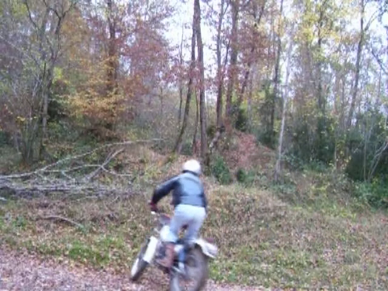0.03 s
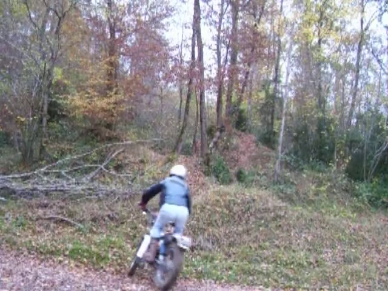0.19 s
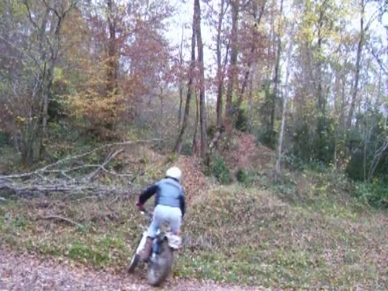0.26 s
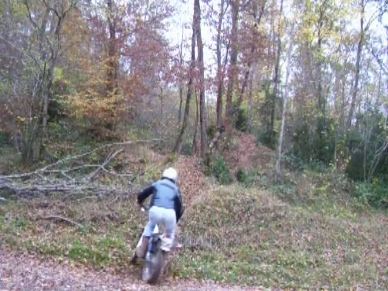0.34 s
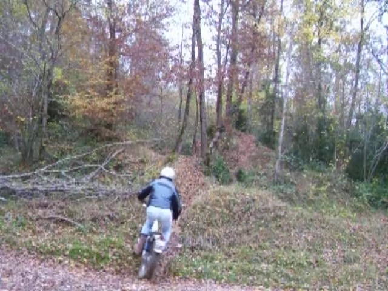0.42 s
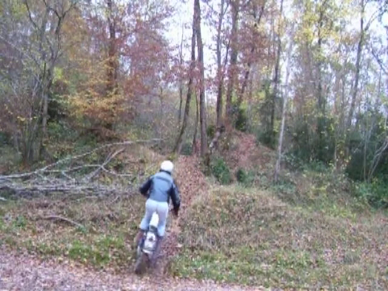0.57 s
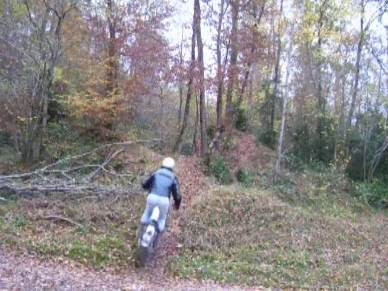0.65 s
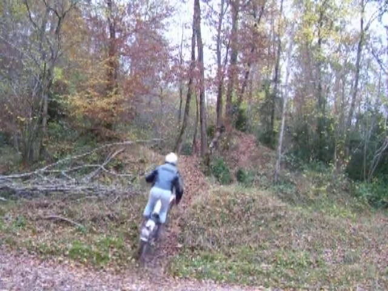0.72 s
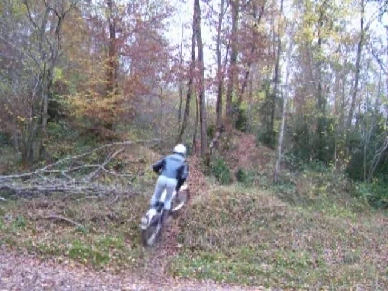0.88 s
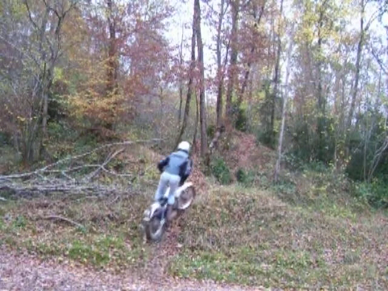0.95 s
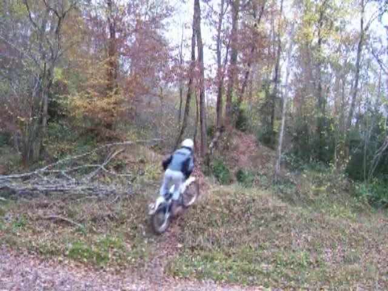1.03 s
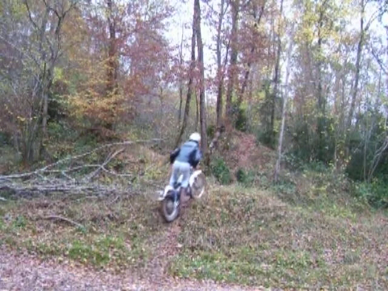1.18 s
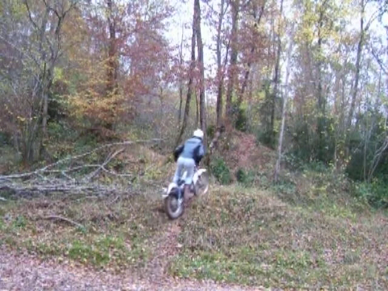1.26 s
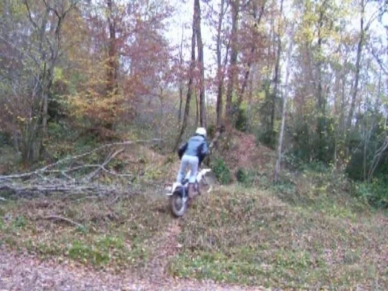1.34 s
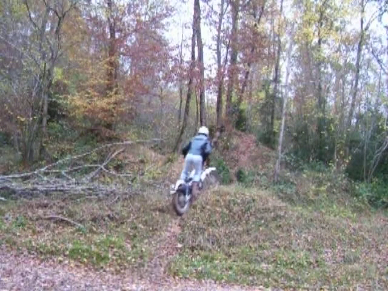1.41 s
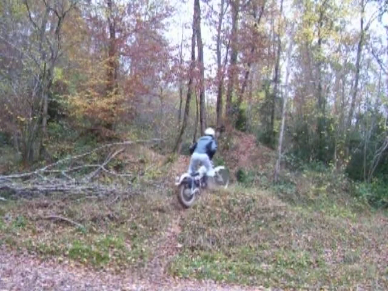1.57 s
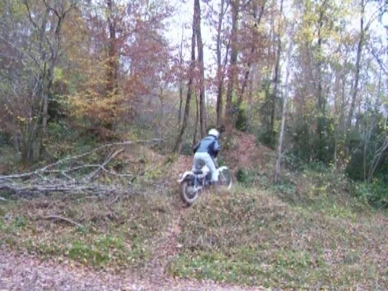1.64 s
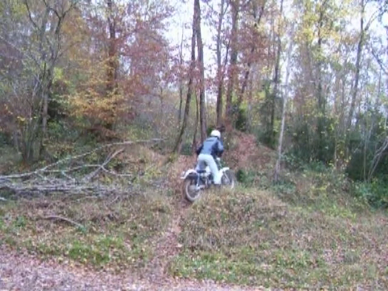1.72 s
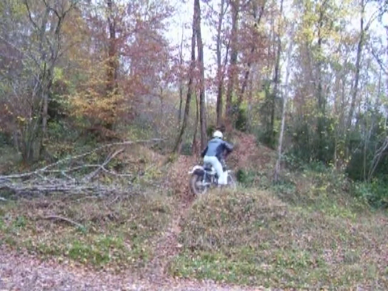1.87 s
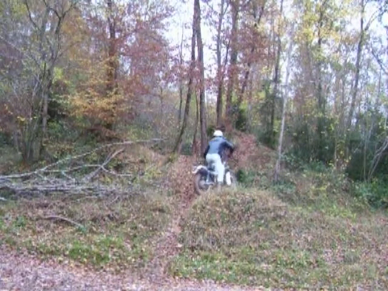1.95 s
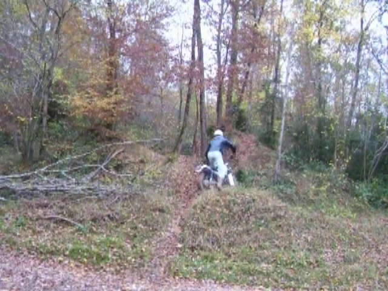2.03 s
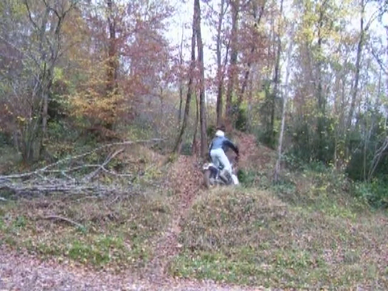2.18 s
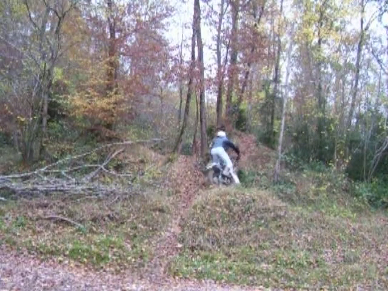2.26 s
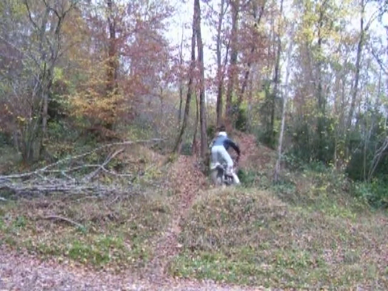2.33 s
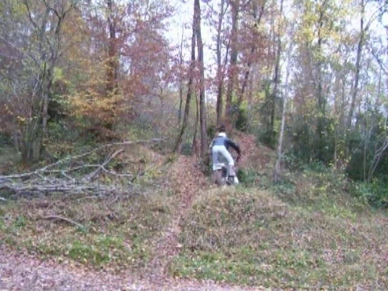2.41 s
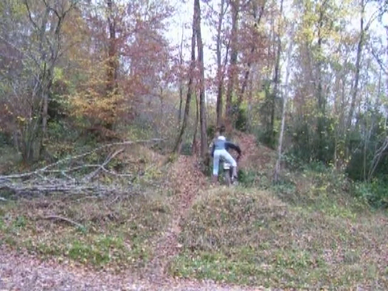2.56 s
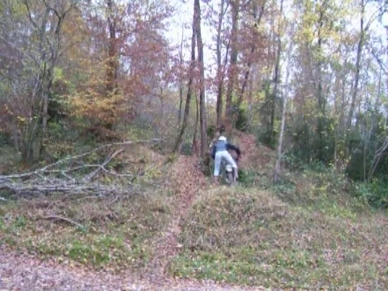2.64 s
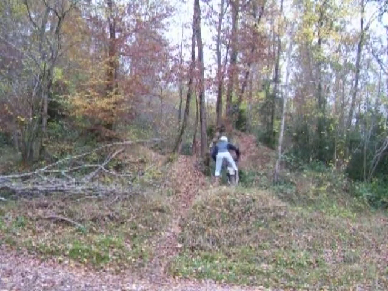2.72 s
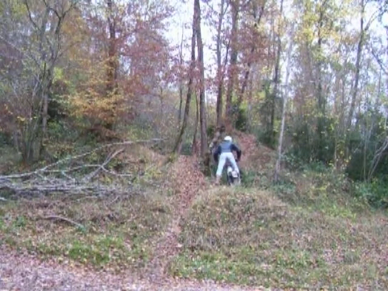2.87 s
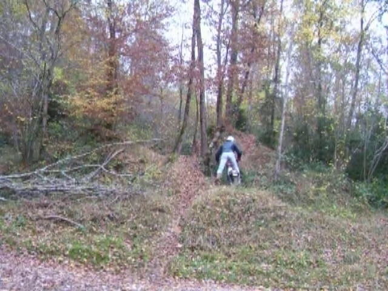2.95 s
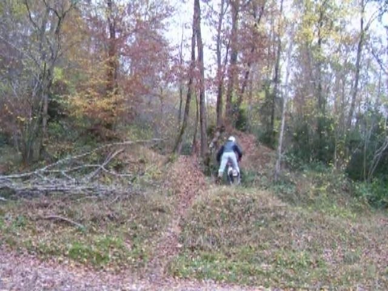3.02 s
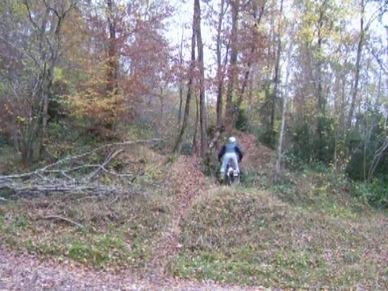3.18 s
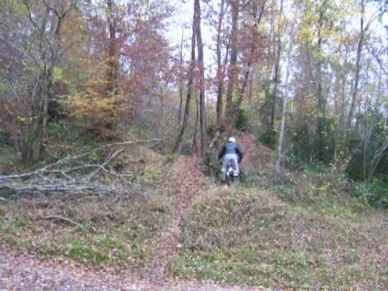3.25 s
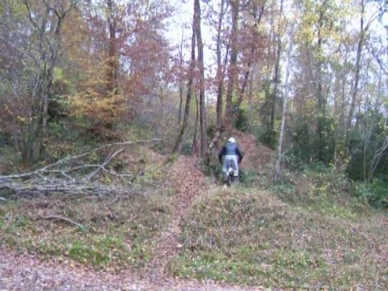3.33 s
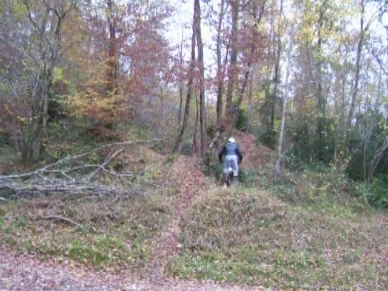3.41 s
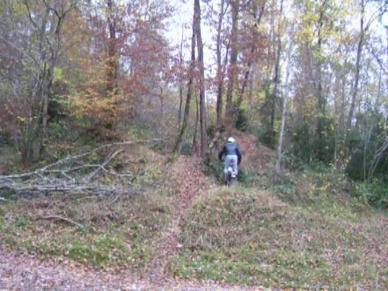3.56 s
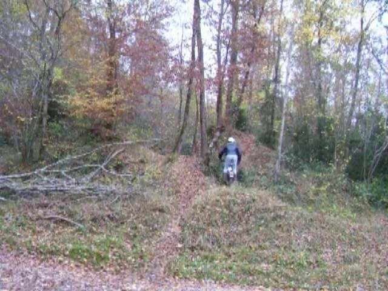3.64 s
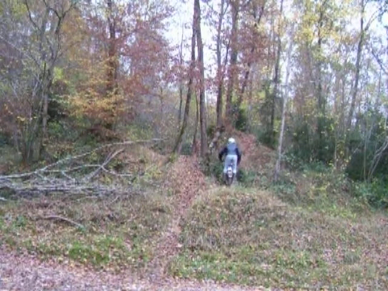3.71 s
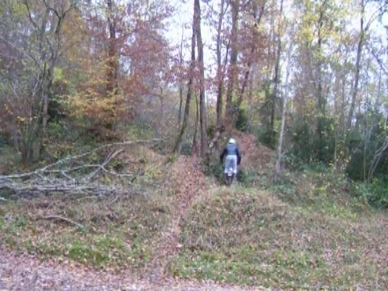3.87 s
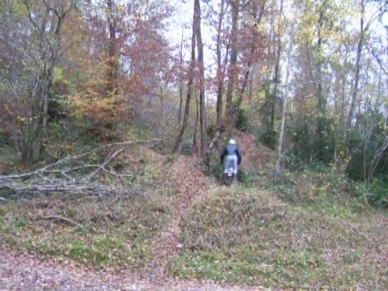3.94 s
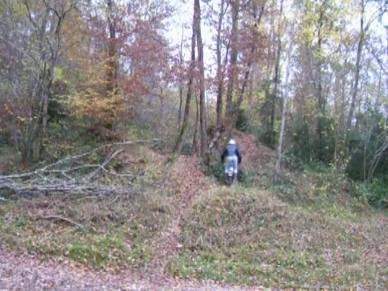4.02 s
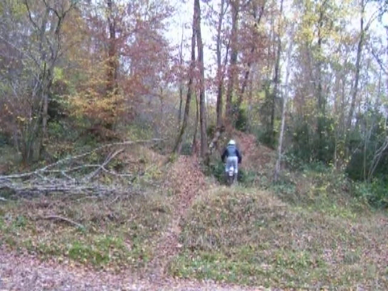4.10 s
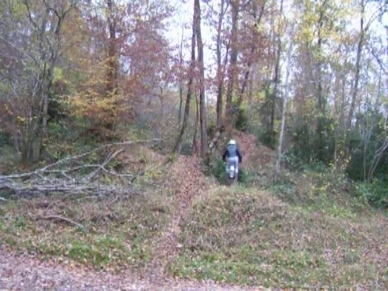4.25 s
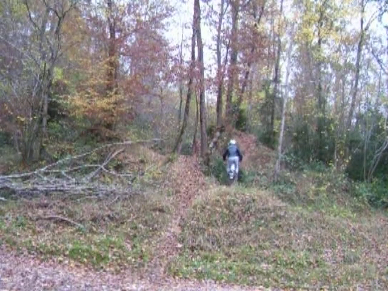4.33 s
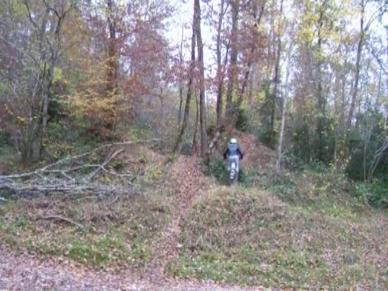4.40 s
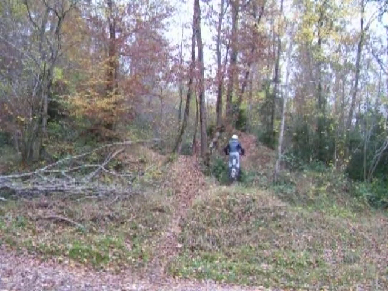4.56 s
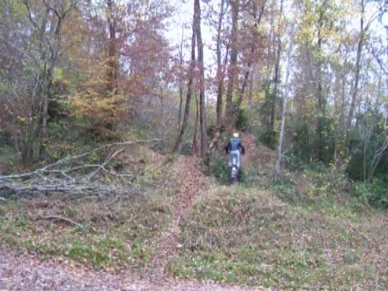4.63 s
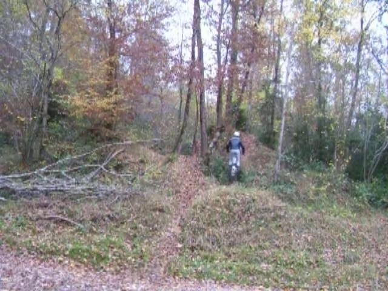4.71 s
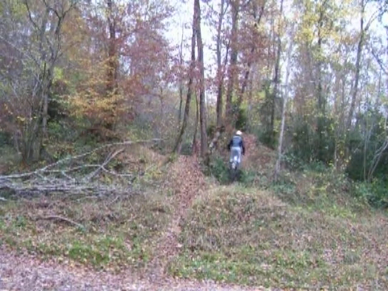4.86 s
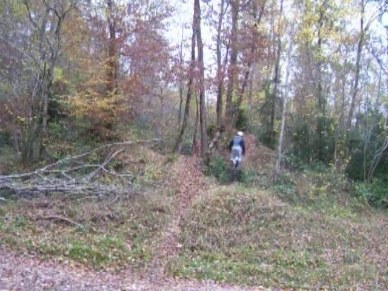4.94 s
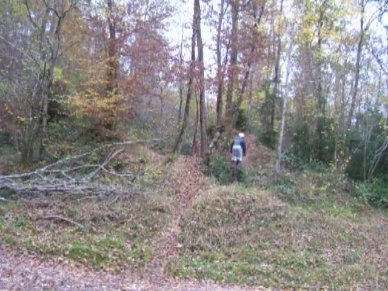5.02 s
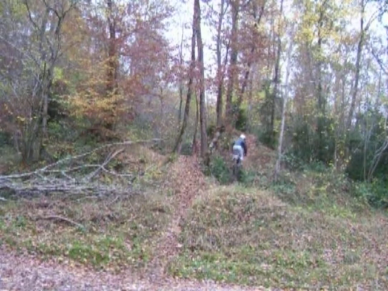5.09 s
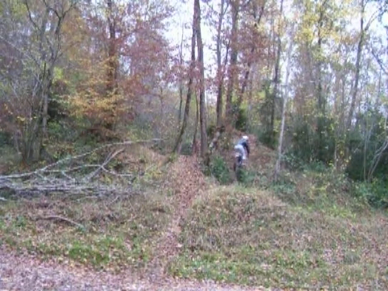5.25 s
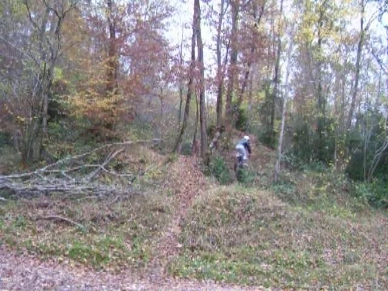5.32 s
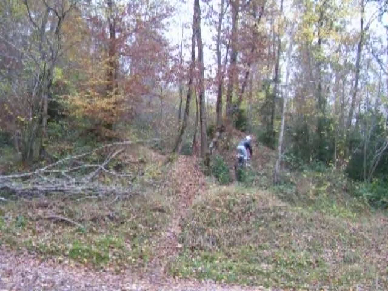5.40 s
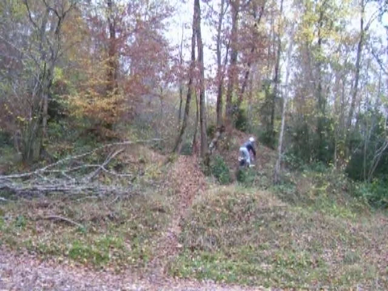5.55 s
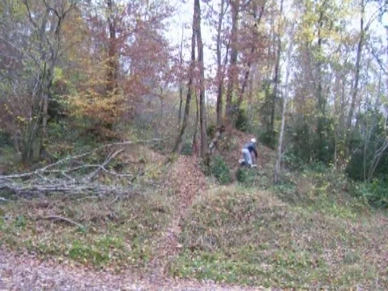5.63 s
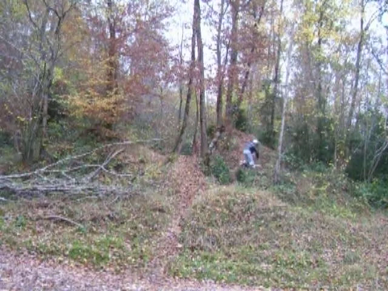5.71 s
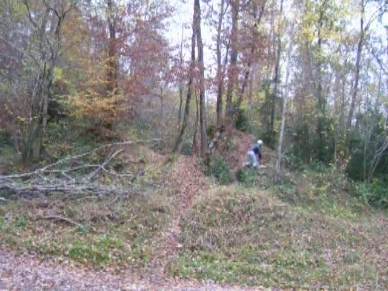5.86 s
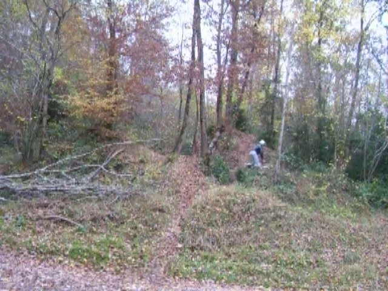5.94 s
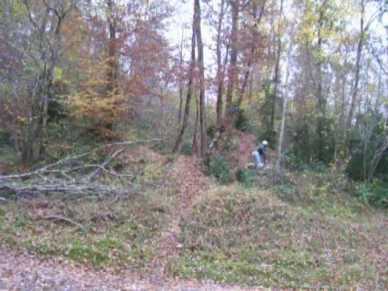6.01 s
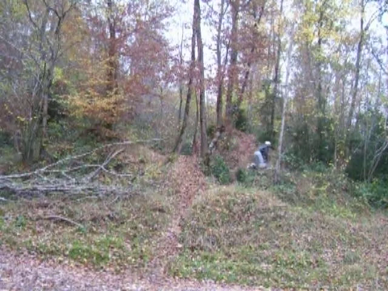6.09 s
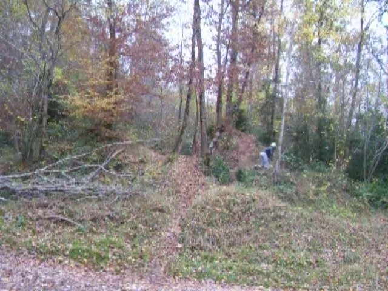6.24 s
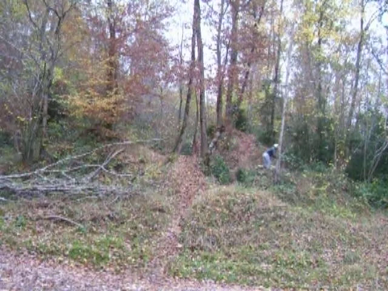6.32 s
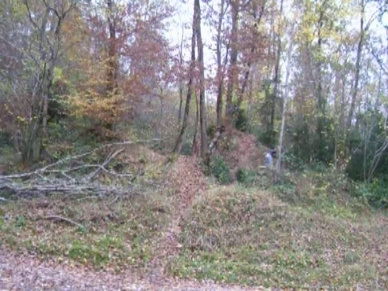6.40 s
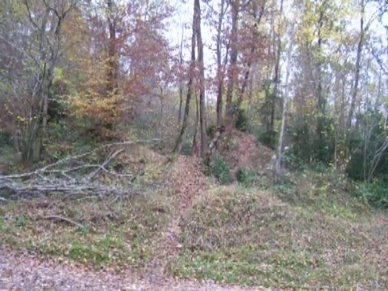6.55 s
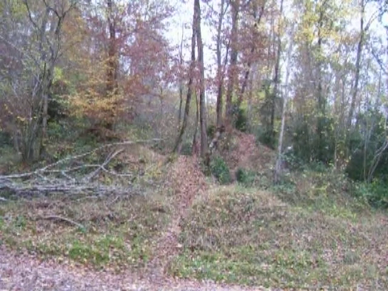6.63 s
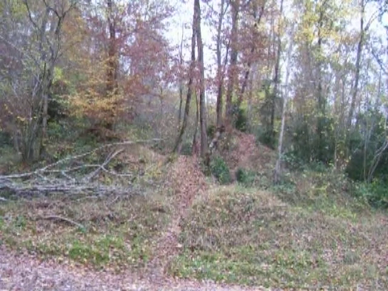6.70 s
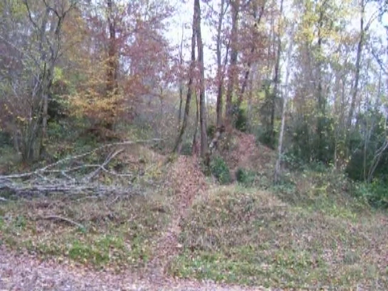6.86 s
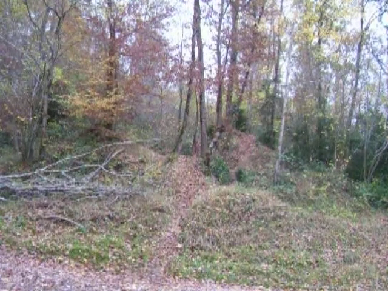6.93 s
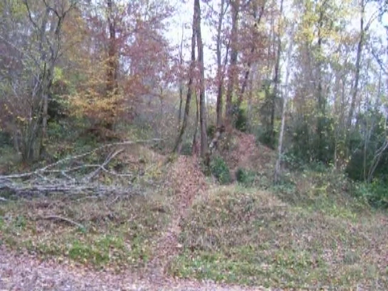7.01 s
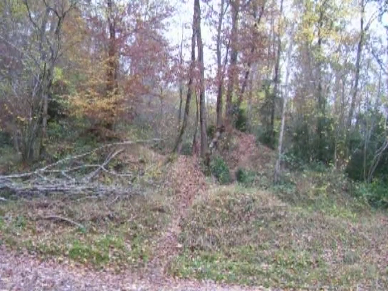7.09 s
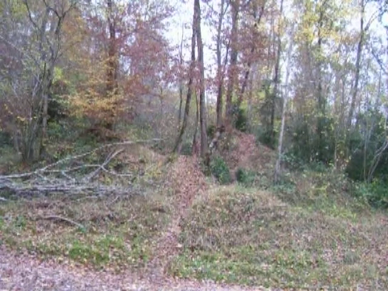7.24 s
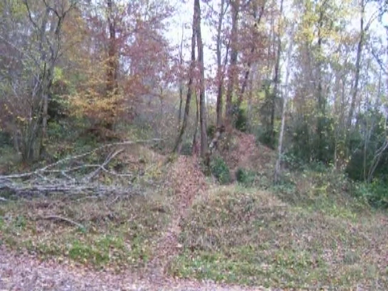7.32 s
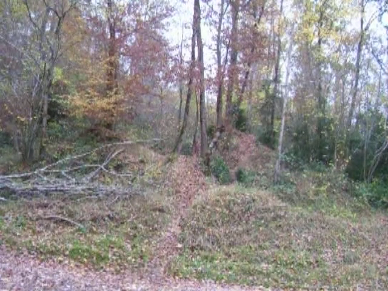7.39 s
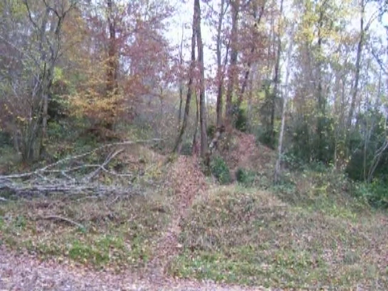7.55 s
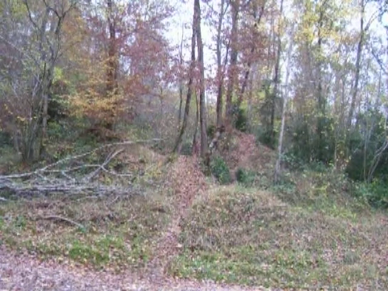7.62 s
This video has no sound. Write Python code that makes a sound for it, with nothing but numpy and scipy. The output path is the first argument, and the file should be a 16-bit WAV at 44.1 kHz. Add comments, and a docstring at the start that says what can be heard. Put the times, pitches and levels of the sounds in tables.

```python
"""A two-stroke dirt bike rides away over humps on a woodland trail: first throttle pulls close together, with two
stretches of louder part-throttle coasting, then longer coasts between pulls, a last faint pull and single pops.
Exhaust pulses, one a turn, excite resonances; off throttle they turn weak and erratic, and pops follow misfires.
Throbbing noise makes the clatter; banks and trees throw the exhaust back, with more far echo as it leaves.
A small camera microphone, band-limited, clips on the loudest bursts."""
import sys
import numpy as np
from scipy import signal
from scipy.io import wavfile
from scipy.ndimage import uniform_filter1d

SR = 44100
rng = np.random.default_rng(int(sys.argv[2]) if len(sys.argv) > 2 else 0)


def persist_wave(psi):
    """Save psi, clipped to +-1, as 16-bit WAV."""
    counts = np.round(np.clip(psi, -1, 1) * 32767).astype(np.int16)
    wavfile.write(sys.argv[1], SR, np.atleast_2d(counts).T)


N = 338247
T = np.arange(N) / SR  # t/s

# crank speed: t/s, speed/(turns per s)
CRANK_SPEED = [(0.0, 67.3), (0.15, 71.9), (0.3, 69.3), (0.54, 67.9), (0.62, 74.8), (0.7, 78), (0.8, 88),
               (1.1, 109), (1.2, 100), (1.4, 86.5), (1.55, 64), (1.7, 57.8), (2.0, 54.5), (2.3, 39.3),
               (2.55, 37.8), (2.78, 40.2), (2.95, 50.5), (3.3, 61.6), (3.43, 53.4), (3.6, 53.9), (3.97, 49),
               (4.08, 55), (4.24, 54.7), (4.42, 59.8), (4.6, 69.8), (4.87, 79), (4.95, 76.2), (5.6, 36),
               (5.87, 39), (7.67, 46.5)]
# throttle pulls, and two stretches of louder coasting with part throttle (from 0.194 and 1.255 s):
# start t/s, end t/s, tailpipe ring rms level/dB at start, at end, then crack, chamber, thump level/dB over the ring
THROTTLE_SPELLS = [(0.0, 0.177, -18, -16.5, -2.5, 0, -9.5), (0.194, 0.529, -24, -25.5, -5.5, -7, -19),
                   (0.53, 0.834, -19, -13, -7.5, -6, -10), (0.834, 1.148, -15.5, -13.5, -1, -7.5, -12.5),
                   (1.163, 1.218, -24.5, -21.5, -1.5, -9.5, -17.5),
                   (1.255, 1.478, -30, -31, -5.5, -3.5, -18), (1.83, 2.044, -22.5, -25.5, -7, -5, -16),
                   (2.412, 2.791, -33, -28.5, -3.5, -2.5, -7),
                   (2.806, 3.299, -21.5, -22.5, -7.5, -6.5, -15),
                   (3.414, 3.644, -26.5, -29.5, -8, -2, -11.5),
                   (3.953, 4.229, -29.5, -29.5, -6.5, -2.5, -11.5), (4.263, 4.916, -28, -24, -3.5, -6, -11),
                   (5.728, 5.862, -37, -37.5, -21, -7, -11)]
# throttle shut: ring level/dB over the clatter, then crack, chamber, thump level/dB over the ring
COAST_LEVELS = [-16, -11.5, -10, -18]
# single firings that stand out: t/s, ring peak level/dB before turbulence is mixed in
SINGLE_POPS = [(0.252, -7), (0.3097, -9.5), (0.3394, -10), (0.381, -7.5), (0.4102, -7), (0.4397, -6.5),
               (0.4523, -11), (0.4836, -6.5), (1.5686, -9.5), (1.647, -12), (1.6964, -17), (1.715, -12.5),
               (1.7842, -8.5), (1.8211, -12.5), (2.125, -15), (2.239, -13), (2.3374, -11), (2.388, -15.5),
               (2.4134, -14.5), (3.3246, -11), (3.356, -11), (3.392, -13), (3.6879, -12.5), (3.7472, -12.5),
               (3.8053, -13.5), (3.8623, -13), (3.9039, -17), (3.927, -17), (4.2608, -17.5),
               (4.9513, -11.5), (5.0308, -15), (5.5276, -17), (5.5799, -12), (5.6449, -16), (5.6963, -16),
               (5.7486, -22.5), (5.7759, -21.5), (5.8027, -22), (5.828, -22), (5.9273, -19), (6.0284, -25),
               (6.0823, -31), (6.3329, -25.5), (6.602, -22.5), (6.72, -24.5), (6.8454, -23), (7.2, -26.5),
               (7.2705, -23), (7.312, -25.5), (7.334, -26), (7.3792, -20.5), (7.4403, -23.5), (7.547, -35)]
# fixed resonances of the exhaust, three tables: f/Hz, width/Hz, level/dB
CRACK_MODES = [(1300, 300, -9), (3060, 260, -4), (3600, 500, -16)]
CHAMBER_MODES = [(530, 115, -1), (705, 125, 0), (915, 150, 1)]
THUMP_MODES = [(72, 74, -3), (133.2, 55, 5.5), (199.9, 46, -2.5), (324, 188, -3)]
# colour of engine clatter, chain and tyres in the leaves: f/Hz, relative level/dB per Hz
CLATTER_COLOUR = [(25, -36.5), (60, -40.5), (110, -17), (250, -15), (420, -3.5), (620, 4.5), (900, 3.5),
                  (1150, -5), (1500, -6), (1900, 1), (2300, -12), (2900, -3), (3600, -15.5), (4300, -41)]
# ground and earth banks near the trail: nominal delay/s (scaled as the bike leaves), level/dB
BANK_ECHOES = [(.0012, -16.5), (.0052, -8), (.009, -12)]
# echo decay among the trees: f/Hz, t60/s
TREE_DECAY = [(200, 0.83), (1000, 0.51), (4000, 0.065)]

TWIST_S = .02  # time the throttle takes to open or shut
START_M, AWAY_M_PER_S = 4.5, 1.8  # distance at the start, and how fast it grows
CLATTER_DB, REV_DB = -24, 4.5  # at the start at 50 turns a second; more per doubled revs
# under load the clatter gains RASP_DB above about this pitch, BODY_DB below it, with a lag
RASP_DB, RASP_FROM_HZ, BODY_DB, SETTLE_S = 5.0, 1100, .8, .04
# ring pitch: unloaded at 50 turns a second, rise as the gas heats under load, its lag, rise per doubled revs
COLD_HZ, HEAT_HZ, HEAT_S, REV_HZ = 1779, 184, 0.31, 70
# crack resonance with the ring at 2000 Hz; it moves as a power of the ring pitch
UPPER_HZ, UPPER_WIDTH_HZ, UPPER_BEND = 2692, 375, 1
# colour of a pop over its ring; crack and chamber scatter at random around theirs
POP_CRACK_DB, POP_CHAMBER_DB, POP_THUMP_DB, POP_SCATTER_DB = -2, -6.5, -18.5, 4
RING_WIDTH_HZ, PUFF_S, POP_PUFF_S = 175, .006, .008
LEAD = round(.0012 * SR)  # samples by which chamber and thump come early
MIC_EDGE_HZ, EDGE_HZ = 4474, 15870  # upper limits before and after clipping


def gain_of(db):
    """dB to gain."""
    return 10 ** (np.asarray(db) / 20)


def evened(x):
    """Scales to rms 1."""
    return x / np.sqrt(np.mean(x ** 2) + 1e-20)


def read(points, hz):
    """Reads a spectrum table at the frequencies hz, along a log pitch axis."""
    f, value = np.transpose(points)
    return np.interp(np.log(hz + 1), np.log(f + 1), value)


def lagged(x, lag_s, start):
    """Follows x with a lag, from the value start."""
    r = np.exp(-1 / (lag_s * SR))
    return signal.lfilter([1 - r], [1, -r], x - start) + start


def crank():
    """Speed and count of turns; the cylinder fires at each whole turn."""
    speed = np.interp(T, *np.transpose(CRANK_SPEED))
    return speed, .32 + np.cumsum(speed) / SR


def throttle():
    """How far each spell is engaged over time, 0-1; one starting at zero is already engaged."""
    spells = []
    for start, end, *_ in THROTTLE_SPELLS:
        inside_s = np.minimum(T - start + (start == 0), end - T)
        spells.append(np.clip(inside_s / TWIST_S + .5, 0, 1))
    return spells


def clatter_db():
    """Clatter level: falls with distance, rises with revs."""
    distance_db = -20 * np.log10(1 + AWAY_M_PER_S * T / START_M)
    return CLATTER_DB + distance_db + REV_DB * np.log2(crank()[0] / 50)


def firing_db():
    """Ring level, and crack, chamber and thump over it: shut and under the clatter, or set by a spell."""
    levels = clatter_db() + np.array(COAST_LEVELS)[:, None]
    for on, (start, end, first_db, last_db, *over_db) in zip(throttle(), THROTTLE_SPELLS):
        ring_db = np.interp(T, [start, end], [first_db, last_db])
        target = ring_db + np.array([0, *over_db])[:, None]
        levels = levels + on * (target - levels)
    return levels[0], *(levels[1:] - levels[0])


def resonate(x, hz, width):
    """A steep resonance: shifts the curve hz down to zero, smooths twice, shifts back."""
    turn = np.exp(2j * np.pi * np.cumsum(hz * np.ones(len(x))) / SR)
    r = np.exp(-np.pi * width / SR)
    smooth = signal.lfilter([(1 - r) ** 2], [1, -2 * r, r * r], x / turn + 1e-18)
    return 2 * (turn * smooth).real


def modes(x, table):
    """Sum of resonances with alternating sign."""
    return sum((-1) ** k * gain_of(db) * resonate(x, hz, width) for k, (hz, width, db) in enumerate(table))


def chamber(x, hz):
    """Chamber resonances, swelling a moment before the port cracks open."""
    return modes(np.roll(x, -LEAD), CHAMBER_MODES)


def thump(x, hz):
    """The low pressure wave, swelling a moment before the port cracks open."""
    return modes(np.roll(x, -LEAD), THUMP_MODES)


def ring(x, hz):
    """The tailpipe's moving resonance."""
    return resonate(x, hz, RING_WIDTH_HZ)


def crack(x, hz):
    """The bright edge: fixed resonances and an upper one that moves with the ring."""
    upper_hz = UPPER_HZ * (hz / 2000) ** UPPER_BEND
    return modes(x, CRACK_MODES) - resonate(x, upper_hz, UPPER_WIDTH_HZ)


def puffed(clicks, rough, puff_s):
    """Each click is followed by a dying puff of turbulent gas."""
    fade = np.exp(-np.arange(2048) / (puff_s * SR))
    puff = signal.oaconvolve(clicks, fade / np.linalg.norm(fade))[:len(clicks)]
    return (1 - rough) * clicks + rough * puff * rng.standard_normal(len(clicks))


def exhaust():
    """Pressure pulses, one a firing: chamber and low thump swell first, then bright crack and tailpipe ring."""
    ring_db, crack_db, chamber_db, thump_db = firing_db()
    speed, turns = crank()
    pop_s, pop_db = np.transpose(SINGLE_POPS)
    scatter_db = POP_SCATTER_DB * rng.standard_normal((len(SINGLE_POPS), 2))
    pop_crack_db, pop_chamber_db = ([POP_CRACK_DB, POP_CHAMBER_DB] + scatter_db).T
    at = np.round(pop_s * SR).astype(int)
    # a pop replaces the firing on its turn and follows a misfire; only the thump of pumped gas goes on
    taken = np.isin(np.round(turns), np.round(turns[at]) - [[0], [1]])
    fired = np.diff(np.floor(turns), prepend=0) > 0
    shut = 1 - np.minimum(sum(throttle()), 1)
    load = np.clip((ring_db - clatter_db()) / 10 + .5, 0, 1)
    ring_hz = COLD_HZ + HEAT_HZ * lagged(load, HEAT_S, 0.19) + REV_HZ * np.log2(speed / 50)
    # with the throttle shut the charges burn erratically and rough
    burn_db = (.5 + 2.5 * shut) * rng.standard_normal(int(turns[-1]) + 1)[turns.astype(int)]
    steady = fired * gain_of(ring_db + burn_db) * np.sqrt(SR / speed)  # faster firing shares the level
    # body, level/dB over the ring, pop level/dB over its ring, roughness, where steady firing sounds
    parts = [(ring, 0, 0, .2, ~taken),
             (crack, crack_db, pop_crack_db, .22, ~taken),
             (chamber, chamber_db, pop_chamber_db, .06, ~taken),
             (thump, thump_db, POP_THUMP_DB, .02, True)]
    click, out = np.arange(8192) == 100, 0
    for body, over_db, pop_over_db, rough, sounding in parts:
        one = body(click, ring_hz.mean())  # a single pulse, to set levels by
        pops = np.zeros(N)
        pops[at] = gain_of(pop_db + pop_over_db) / abs(one).max()
        firings = sounding * steady * gain_of(over_db) / np.linalg.norm(one)
        drive = puffed(firings, rough * (1 + 2.5 * shut), PUFF_S)
        # a pop is slightly rough, its ring and crack cleaner than the weak shut-throttle firings
        pop_drive = puffed(pops, 1.3 * rough + .05, POP_PUFF_S)
        out = out + body(drive + pop_drive, ring_hz)
    return out


def clatter():
    """Patchy coloured noise that throbs with each crank turn."""
    frames, hz = N // 128 + 5, np.fft.rfftfreq(512, 1 / SR)
    real, imag, patches = rng.standard_normal((frames, 257, 3)).T
    patches = evened(uniform_filter1d(uniform_filter1d(patches, 6, 0), 16, 1))  # over pitch, then time
    engaged = lagged(np.minimum(sum(throttle()), 1), SETTLE_S, 0.76)
    load = np.interp(np.arange(frames) * 128 / SR, T, engaged)
    treble = np.clip(2 * np.log2(hz / RASP_FROM_HZ + .001), 0, 1)  # rises over half an octave
    lift_db = (BODY_DB + (RASP_DB - BODY_DB) * treble)[:, None] * load
    colour_db = read(CLATTER_COLOUR, hz)[:, None] + 2.0 * patches + lift_db
    z = (real + 1j * imag) * gain_of(colour_db)
    noise = evened(signal.istft(z, nperseg=512, noverlap=384)[1][:N])
    throb_db = 0.63 * np.cos(2 * np.pi * (crank()[1] - .25))
    return noise * gain_of(clatter_db() + throb_db)


def banks(x):
    """Near reflections: the reflected paths shorten against the direct one as the bike gets farther."""
    stretch = 1.2 - 0.0509 * T
    return sum(gain_of(db) * np.interp(T - delay_s * stretch, T, x) for delay_s, db in BANK_ECHOES)


def woods(x):
    """Trunks scatter the sound back: sparse taps of random sign, each band dying at its own speed."""
    taps = np.zeros(SR)
    at = np.arange(300, SR - 20, 20)
    taps[at + rng.integers(0, 20, len(at))] = rng.choice([-1., 1.], len(at))
    hz, t, z = signal.stft(taps, SR, nperseg=256)
    decay_db = -60 * t / read(TREE_DECAY, hz)[:, None]
    tail = signal.istft(z * gain_of(decay_db), SR, nperseg=256)[1]
    return signal.fftconvolve(x, tail / np.linalg.norm(tail))[:N]


def scene():
    """The bike with its near reflections; the share of far echo grows as it rides off."""
    pipe = exhaust()
    echo_db = -15 + .5 * T
    return (pipe + clatter() + banks(pipe) + woods(pipe * gain_of(echo_db)))[None]


def record(dry):
    """The preamp squeezes peaks, the channel is narrow, overshoots clip hard, then the band limit."""
    thin = signal.sosfilt(signal.butter(2, 45, "high", fs=SR, output="sos"), dry)
    knee, ceiling = .85, .715  # full scale is 1
    squeezed = thin / (1 + (thin / knee) ** 4) ** (1 / 4)
    mic_band = signal.firwin(701, MIC_EDGE_HZ, window=("kaiser", 11), fs=SR)
    narrow = signal.oaconvolve(squeezed, mic_band[None], "same")
    clipped = np.clip(narrow, -ceiling, ceiling)
    final_band = signal.firwin(511, EDGE_HZ, window=("kaiser", 9), fs=SR)
    return signal.oaconvolve(clipped, final_band[None], "same")


dry = scene()
out = record(dry)
persist_wave(out)
```